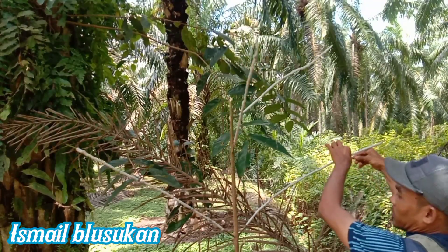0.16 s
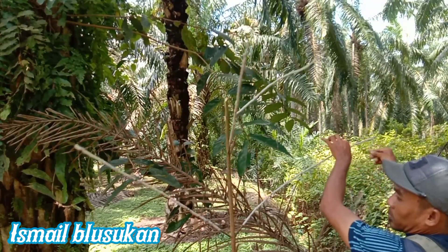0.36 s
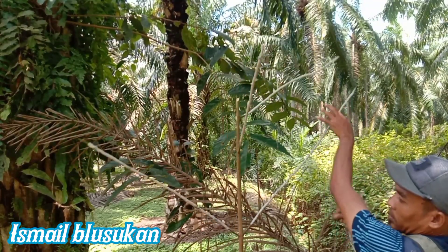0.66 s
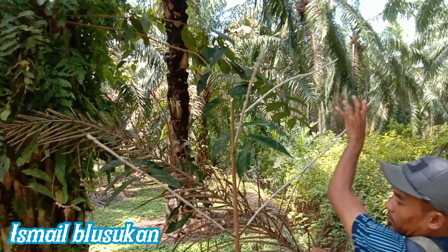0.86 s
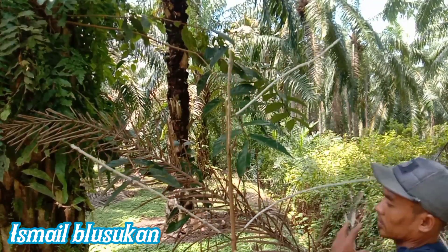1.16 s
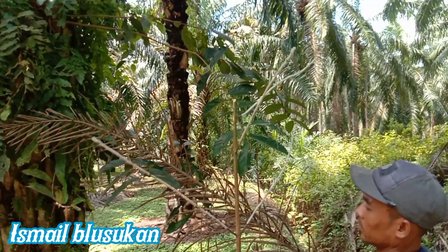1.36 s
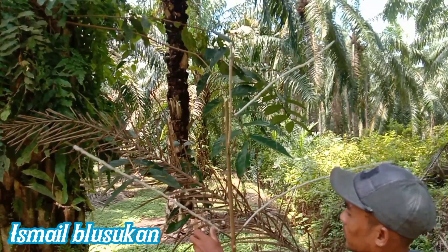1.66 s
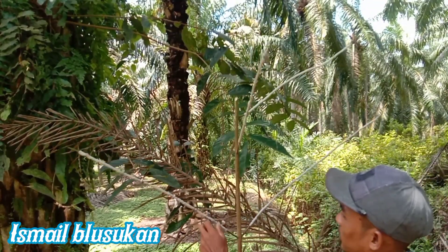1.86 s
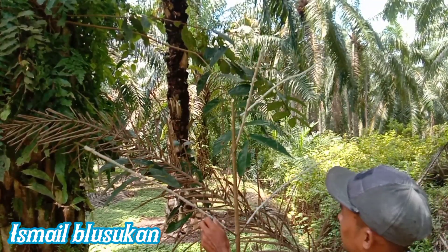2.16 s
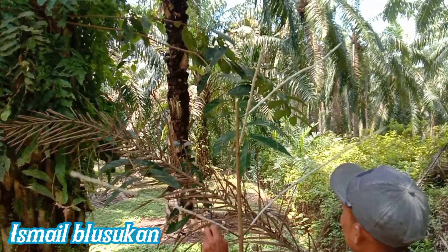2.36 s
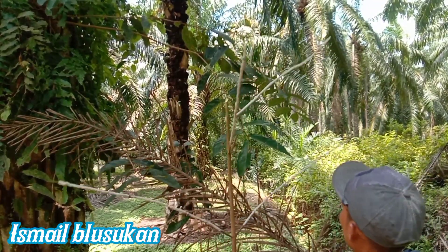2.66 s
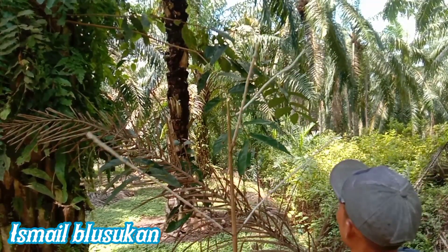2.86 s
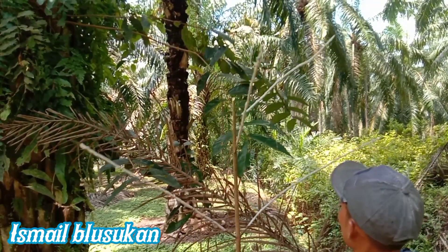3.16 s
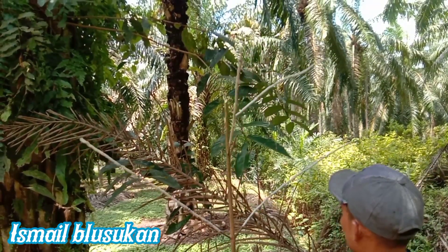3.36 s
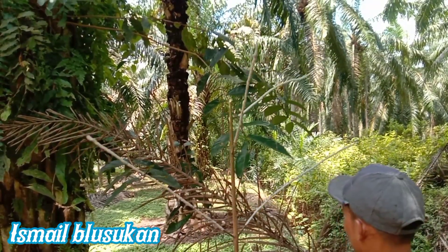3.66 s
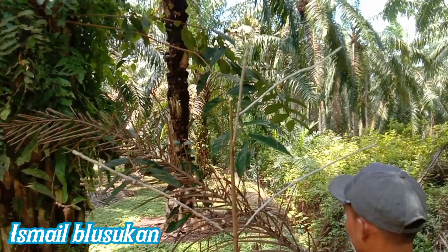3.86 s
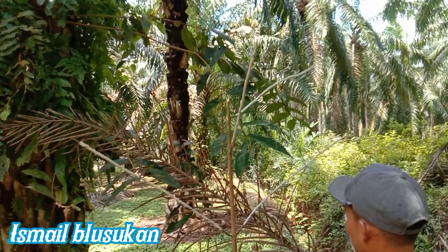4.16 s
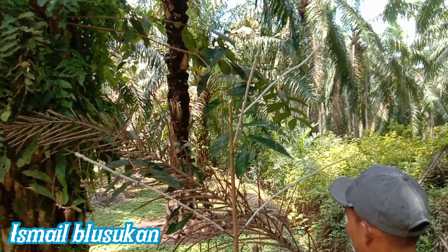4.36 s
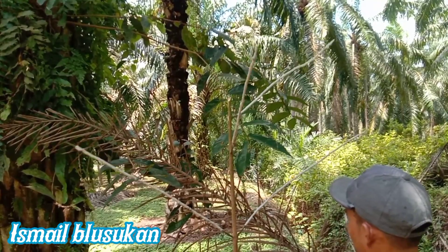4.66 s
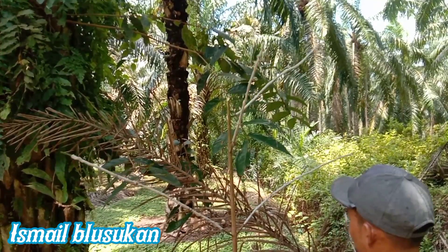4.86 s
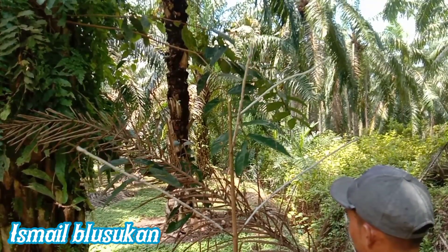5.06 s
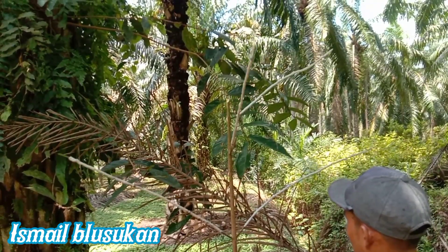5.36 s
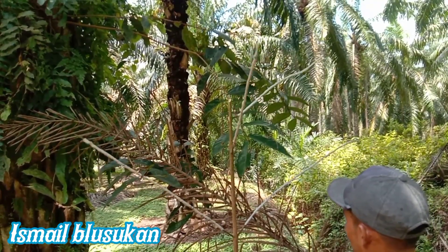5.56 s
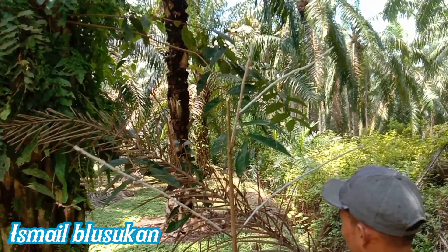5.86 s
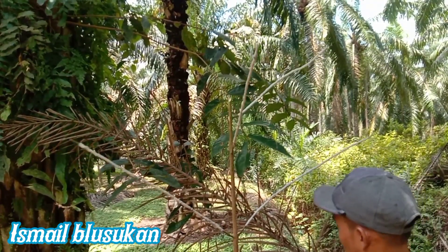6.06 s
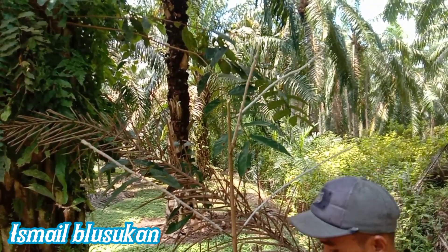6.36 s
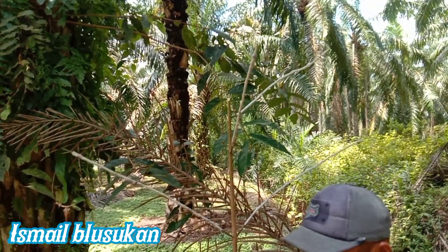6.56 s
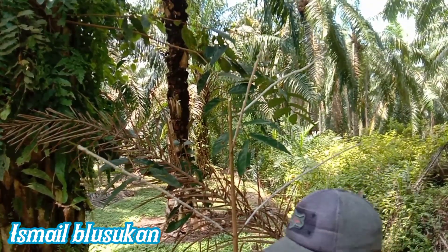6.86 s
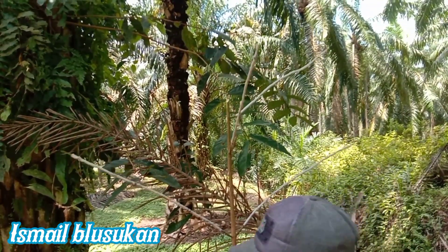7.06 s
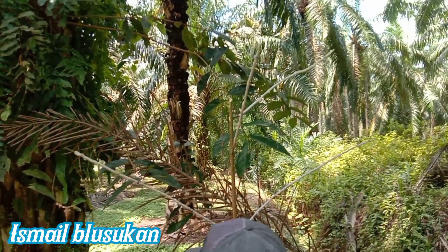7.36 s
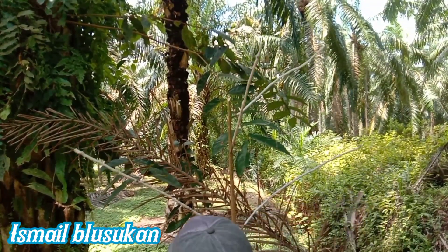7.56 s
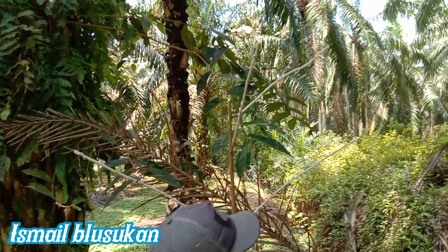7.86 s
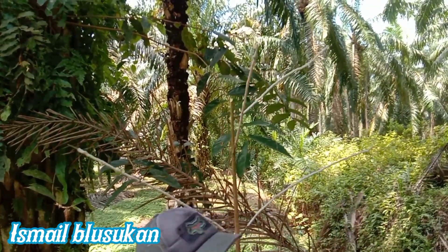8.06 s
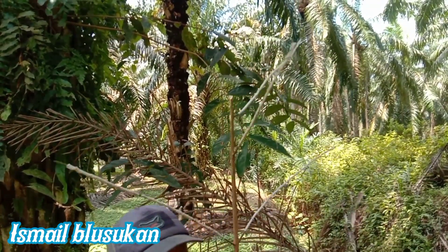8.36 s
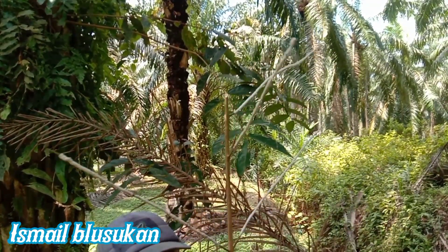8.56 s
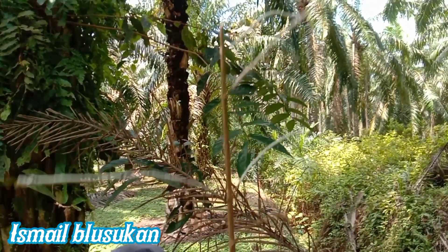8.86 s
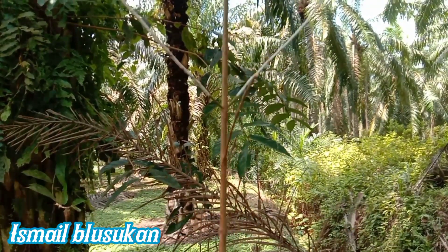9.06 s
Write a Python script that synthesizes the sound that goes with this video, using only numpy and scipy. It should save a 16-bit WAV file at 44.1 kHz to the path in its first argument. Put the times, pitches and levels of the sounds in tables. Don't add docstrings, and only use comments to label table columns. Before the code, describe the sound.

Soft insect shimmer, microphone bumps and faint far chirps outdoors, then nearby speaker hiss, a few clicks, and loud piercing whistled bird notes.

```python
import sys
import numpy as np
from scipy import signal
from scipy.io import wavfile
from scipy.ndimage import uniform_filter1d

SR = 44100
rng = np.random.default_rng(int(sys.argv[2]) if len(sys.argv) > 2 else 0)


def output_pcm(signal):
    pcm = np.clip(np.atleast_2d(signal).T, -1, 1) * 32767
    wavfile.write(sys.argv[1], SR, np.round(pcm).astype(np.int16))


def invert_db(level):
    return 10 ** (np.asarray(level, dtype=float) / 20)


N = 406161
TIME_S = np.arange(N) / SR


def evened(x):
    return x / np.sqrt(np.mean(x ** 2) + 1e-20)


def add(mix, s, sound):
    part = mix[round(s * SR):][:len(sound)]
    part += sound[:len(part)]


def along(rows):
    return np.interp(TIME_S, *np.transpose(rows))


def wander(per_s):
    size = int(SR / per_s)
    return evened(uniform_filter1d(uniform_filter1d(rng.standard_normal(N), size), size))


def noise(colour, lo_hz, hi_hz, size, patchy_db, patch=(7, 9)):
    hz = np.fft.rfftfreq(size, 1 / SR)
    a, b, patches = rng.standard_normal((N * 4 // size + 6, len(hz), 3)).T
    for axis in (0, 1):
        patches = uniform_filter1d(patches, int(patch[axis]), axis=axis)
    colour_hz, colour_db = np.transpose(colour)
    shape = invert_db(np.interp(np.log(hz + 1), np.log(colour_hz), colour_db, left=-90, right=-90))
    inside = (hz >= lo_hz) & (hz <= hi_hz)
    share = np.sqrt(np.sum(shape[inside] ** 2) / np.sum(shape ** 2))
    z = (a + 1j * b) * shape[:, None] * invert_db(patchy_db * evened(patches))
    return evened(signal.istft(z, nperseg=size, noverlap=size * 3 // 4)[1][:N]) / share


def resonate(x, hz, width):
    b, a = signal.iirpeak(hz, hz / width, SR)
    return signal.lfilter(b, a, signal.lfilter(b, a, x))


def butter(order, hz, kind):
    return signal.butter(order, hz, kind, fs=SR, output='sos')


def dulled(x, hz):
    return signal.lfilter(*signal.butter(2, hz, fs=SR), x)


def band_gain(x, gain, order, hz, kind):
    return x + (gain - 1) * signal.sosfilt(butter(order, hz, kind), x)


def loudness_db(x, size):
    return 10 * np.log10(abs(uniform_filter1d(x ** 2, size=size)) + 1e-12)


def swells(rows, fall_s):
    t = np.arange(0, N + 64, 64) / SR
    power = 0
    for s, db, rise_s in rows:
        away = np.maximum((s - t) / rise_s, (t - s) / fall_s)
        power = power + invert_db(2 * db) * np.exp(-2 * away)
    return np.interp(TIME_S, t, np.sqrt(power))


def whistle(rows, overtones, growth):
    s, hz, db = np.transpose(rows)
    t = np.arange(s[0], s[-1], 1 / SR)
    hz, db = (uniform_filter1d(np.interp(t, s, c), size=60) for c in (hz, db))
    angle = 2 * np.pi * np.cumsum(hz) / SR
    tone = sum(invert_db(o_db + (k > 1) * growth * db) * np.sin(k * angle) for k, o_db in overtones)
    return np.sqrt(2) * invert_db(db) * tone * signal.windows.tukey(len(t), .1)


def trunks(x, t60, gap_s, late_db, late_t60, dull_hz):
    taps, at = np.zeros(SR), np.arange(0, SR - 20, 20)
    taps[at + rng.integers(0, 20, len(at))] = rng.choice([-1., 1.], len(at))
    t = np.arange(SR) / SR
    late = dulled(taps * invert_db(late_db - 60 * t / late_t60), dull_hz)
    tail = (t > gap_s) * (taps * invert_db(-60 * t / t60) + late)
    return signal.fftconvolve(x, tail / np.linalg.norm(tail))[:N]


# pitch_hz, level_db per Hz
AIR_COLOUR = [(35, -20), (70, -10), (100, -13.5), (150, 0), (314, -9), (1060, -15.5), (1270, -14.5),
              (3830, -21), (4650, -7), (5650, -2.5), (6470, -32.5), (7270, -31), (15500, -33.5)]


def air():
    return invert_db(-70.5) * noise(AIR_COLOUR, 150, 15500, size=1024, patchy_db=2.5)


# start_s, level_db
BREEZE = [(0, 3.5), (.3, 0), (1.2, 1), (1.77, 1.5), (2.15, -3.5), (2.55, 14.5), (2.85, 2), (3.2, 5),
          (3.65, 18.5), (4.0, -0.5), (4.35, 17.5), (5.0, 1.5), (5.5, 1), (5.9, 7), (6.75, -8), (7.6, 9.5),
          (8.5, 7.5), (9.1, 20)]
# pitch_hz, level_db per Hz
WIND_COLOUR = [(8.8, -55), (15, -12), (27, -29), (46, -18), (70, 3), (97, 1), (166, -11.5), (326, -37),
               (400, -38.5), (520, -72), (880, -120)]
# start_s, peak level_db, pitch_hz
THUMPS = [(1.338, -50, 92), (2.486, -37.5, 95.9), (2.559, -41.5, 81), (3.396, -40, 82), (3.467, -42, 100),
          (3.617, -33, 93), (3.717, -37, 88), (3.874, -40.5, 82.4), (4.247, -23, 90), (4.39, -31.5, 94),
          (4.62, -34, 101), (4.785, -41, 107), (4.882, -36, 62), (4.95, -30.5, 131), (5.136, -41.5, 122),
          (5.201, -47.5, 96), (5.294, -45, 109), (5.413, -45.5, 93), (5.574, -44, 85.4), (5.762, -47.5, 72),
          (5.954, -42, 60), (6.21, -45, 123), (6.314, -36.5, 115), (7.387, -41.5, 54.7), (7.46, -45, 89),
          (7.548, -49, 72.7), (7.832, -40.5, 101), (8.12, -55, 81), (9.141, -34, 70.2), (9.022, -32, 103)]
# start_s, level_db, rise_s
SHAKES = [(1.17, -66.5, 0.049), (1.69, -74, .03), (2.66, -76, 0.3), (2.78, -75, .03), (3.76, -68, 0.32),
          (4.02, -91, .015), (4.36, -68.5, 0.11), (4.66, -72, .03), (4.98, -68.5, 0.094), (5.95, -72, 0.31),
          (6.11, -78, .015), (6.23, -71, 0.017), (6.81, -71, 0.15)]


def wind():
    breeze = along(BREEZE)
    buffet_s = 0.047
    buffet = swells([(s + buffet_s / 2, db - 10, buffet_s / 2) for s, db, hz in THUMPS], buffet_s)
    lumps = invert_db(-4.5 + 2.5 * wander(40))
    rumble = noise(WIND_COLOUR, 40, 200, size=2048, patchy_db=4.5)
    out = np.hypot(invert_db(-70 + breeze), buffet) * lumps * rumble
    for s, db, hz in THUMPS:
        cycles = np.arange(-1.2, 1.6, hz / SR)
        add(out, s, invert_db(db - 8.5) * np.cos(2 * np.pi * cycles) * np.exp(-(cycles / 0.77) ** 2))
    leaves = [(400, -11.0), (1200, -9.5), (2200, -10.0), (4000, -15.5), (9000, -24.0), (15500, -32)]
    rustle = np.hypot(invert_db(-86.5 + 0.21 * breeze), swells(SHAKES, fall_s=0.12))
    return out + invert_db(-8.5) * rustle * noise(leaves, 1500, 2600, size=256, patchy_db=4.5)


# pitch_hz, width_hz, level_db, throb_db, pulse_db
CHORUS = [
    (135.7, 32, -75, -1.5, -1),
    (1270, 81, -83.5, 4, 0),
    (7340, 470, -88.5, 1, 3),
]
# pitch_hz, level_db per Hz
CICADAS = [(2290, -64), (4000, -51.5), (4200, -15.5), (4670, 1.5), (4890, 4.5), (5170, -11.5), (5630, 5.5),
           (5900, -1), (6300, -26.5), (6600, -21.5), (8580, -65), (14500, -120)]
# start_s, pitch_hz, level_db
HIGH_TICKS = [(1.222, 15150, -64), (8.205, 15100, -54), (8.36, 15000, -53), (8.497, 15100, -53),
              (8.722, 14500, -61), (9.132, 15100, -66)]


def insects():
    pulse_per_s, pulse_at_s = 8.48, 2.052
    pulse = np.tanh(2 * np.sin(2 * np.pi * pulse_per_s * (TIME_S - pulse_at_s)))
    out = np.zeros(N)
    for hz, width, db, throb_db, pulse_db in CHORUS:
        line = evened(resonate(rng.standard_normal(N), hz, width))
        out += invert_db(db + throb_db * wander(24) + pulse_db * pulse) * line
    streaks = noise(CICADAS, 4400, 6000, size=512, patchy_db=3.5, patch=(3, 30))
    out += invert_db(-68 + 0.2829 * along(BREEZE)) * streaks
    t = np.arange(500) / SR
    for s, hz, db in HIGH_TICKS:
        add(out, s, invert_db(db) * np.sin(2 * np.pi * hz * t) * np.hanning(len(t)))
    return out


# start_s,
# length_s, pitch_hz, width_hz, level_db
NOISE_SWELLS = [(1.118, 0.12, 2000, 602, -76), (2.73, 0.07, 1900, 60, -81), (2.74, 0.23, 2460, 90, -82),
                (3.7, 0.22, 1800, 70, -80), (3.6, .07, 1190, 80, -70), (3.425, .1, 1400, 120, -78),
                (3.645, .06, 5700, 300, -61.5), (3.722, .06, 5000, 900, -58), (3.478, .06, 4800, 300, -68),
                (5.95, .04, 5400, 700, -57), (6.665, 0.026, 990, 200, -72), (6.748, 0.11, 1370, 250, -71),
                (6.817, 0.033, 1004, 150, -67), (6.865, 0.0038, 3000, 1500, -62.5),
                (7.301, 0.13, 810, 540, -67.5), (8.481, 0.062, 840, 350, -58), (6.383, .24, 62, 35, -71),
                (6.6, .24, 61, 35, -74), (6.794, 0.17, 60, 38, -74), (2.95, 0.22, 65, 44, -67),
                (3.95, 0.16, 65, 40, -68), (7.65, .24, 57, 35.02, -66), (8.326, .03, 660, 400, -61),
                (8.53, 0.06, 760, 400, -63), (8.95, 0.06, 500, 300, -67), (5.51, .24, 1270, 65, -73.5),
                (5.6, .2, 1270, 67, -77), (8.468, .03, 7000, 500, -37.5), (7.6, .24, 1750, 300, -61.5),
                (3.23, .075, 8700, 1500, -72), (3.555, .075, 8700, 1500, -71), (5.455, .07, 8700, 1500, -77),
                (5.78, .07, 8700, 1500, -77), (7.95, .04, 6900, 600, -50), (3.225, .07, 4100, 500, -72),
                (3.55, .09, 4000, 500, -69), (5.45, .06, 4100, 500, -74)]


def noise_swells():
    out = np.zeros(N)
    grits = rng.standard_normal((len(NOISE_SWELLS), SR // 4))
    for (s, length_s, hz, width, db), grit in zip(NOISE_SWELLS, grits):
        count = round(length_s * SR)
        rub = evened(resonate(grit, hz, width))[-count:]
        add(out, s, invert_db(db) * rub * signal.windows.tukey(count, .6))
    return out


# start_s, peak level_db, pitch_hz, bright_db
TICKS = [(0.867, -67, 1270, 3), (1.071, -67, 1250, -4), (1.225, -69, 1620, -10), (1.687, -71, 1540, -10),
         (4.178, -62.5, 1270, -12), (5.066, -76, 1270, 14), (5.702, -64, 1280, -6), (6.107, -60.5, 1280, 0),
         (6.234, -63.5, 1280, -6), (2.095, -65, 1270, -20), (2.488, -66, 1290, -12),
         (3.618, -66, 1210, -15), (4.018, -69, 1610, -4), (5.573, -65, 1290, -12), (5.83, -64, 1270, -6),
         (6.802, -68, 1280, -12), (1.156, -67, 2280, -6), (8.331, -47, 1310, -28),
         (8.339, -35.5, 1400, -22), (8.404, -42.5, 1270, -28), (8.482, -51, 1230, -26),
         (8.488, -52, 895, -26), (8.497, -55, 790, -23), (8.51, -58, 1630, -26), (8.523, -61, 1230, -25),
         (8.534, -45, 1030, -26), (8.556, -38, 1210, -24), (8.564, -37, 1269, -23), (8.362, -39, 1470, 9.5),
         (7.5, -40.0, 2600, -13), (8.548, -43, 1000, -17), (7.3, -51.5, 1170, -20)]


def ticks():
    out, t = np.zeros(N), np.arange(900) / SR
    grits = rng.standard_normal((len(TICKS), 900))
    for (s, db, hz, bright_db), grit in zip(TICKS, grits):
        ring = np.sin(2 * np.pi * hz * t) * invert_db(-60 * t / 0.03) * np.minimum(t / 0.00062, 1)
        grain = uniform_filter1d(grit, size=1 if bright_db > 2 else 7)
        snap = invert_db(bright_db - 60 * t / .004) * grain
        add(out, s, invert_db(db + 5.0) * (ring + snap))
    return out


# start_s, pitch_hz, level_db
SQUEAK = [(0, 3930, -21), (.022, 4600, -2), (.032, 5120, 0), (0.038, 5800, -5), (.048, 4600, -10),
          (.057, 4150, -5.5), (.074, 3910, 0.5), (0.085, 3840, -9), (.095, 3800, -30)]
PEEP = [(0, 4500, -8), (.005, 4380, 1), (.011, 4130, 5), (.024, 4020, -2), (.032, 4000, -22)]
CHIP = [(0, 2720, -24), (.029, 2964, -10), (.034, 4200, -11), (.039, 4240, -10), (.045, 3247, -2),
        (0.071, 3204, 2), (.078, 2950, -5.5), (.087, 2600, -13.5), (.096, 2450, -33)]
# multiple of the pitch, level_db
SQUEAK_OVERTONES = [(2.045, 0)]
PEEP_OVERTONES = [(2.2, -23)]
CHIP_OVERTONES = [(1.999, -11.5), (2.96, -26.5), (4, -42)]
# start_s, level_db, fundamental level_db, pitch factor
SQUEAKS = [(1.095, -71.5, 5.5, 0.96), (3.165, -55, -23, 0.95), (3.49, -54, -14, 0.94),
           (5.39, -61.5, -15, 0.95), (5.715, -62, 1.5, 0.95)]
PEEPS = [(1.183, -70, 2, 1.0), (3.258, -72, -4, 1), (3.58, -60.5, -3, 1), (5.482, -69, 1, 1.0),
         (5.797, -62, 3.5, 0.99)]
CHIPS = [(1.265, -56, 0.5, 1.014), (3.335, -47.5, -7, 0.99), (3.66, -47.5, -1.5, 1.01),
         (5.56, -53, -2, .99), (5.875, -49, -2.5, 1.02)]


def far_bird():
    out = np.zeros(N)
    for calls, shape, overtones in ((SQUEAKS, SQUEAK, SQUEAK_OVERTONES),
                                    (PEEPS, PEEP, PEEP_OVERTONES),
                                    (CHIPS, CHIP, CHIP_OVERTONES)):
        for s, db, first_db, pitch in calls:
            voice = whistle(np.multiply(shape, [1, pitch, 1]), [(0.99, first_db)] + overtones, growth=1.3)
            add(out, s, invert_db(db) * voice)
    flutter = np.sin(2 * np.pi * 131 * TIME_S) + np.sin(2 * np.pi * 223 * TIME_S)
    out = invert_db(2.2 * flutter) * dulled(out, 10500)
    wet = trunks(out, t60=0.18, gap_s=0.0047, late_db=-17, late_t60=0.7, dull_hz=4230)
    return invert_db(-2.5) * out + invert_db(-5.5) * wet


# start_s, pitch_hz, level_db
OPENER = [(0, 4680, -51), (.009, 5670, -36.5), (.032, 6140, -17), (.052, 6630, -9), (.069, 6710, -15),
          (.081, 6700, -26)]
RISE = [(0, 3029, -37), (.02, 3230, -23.5), (.038, 3520, -15), (.045, 3620, -7), (.067, 3884, -3),
        (.092, 4166, -3), (.103, 3875, -10), (.115, 3600, -11)]
TURN = [(0, 3655, -12), (.006, 3930, -6.5), (.017, 4500, -20.5), (.04, 4620, -26), (0.044, 4600, -27.5),
        (.048, 4643, -10), (.06, 5860, -24.5), (.074, 5250, -19), (.098, 4330, -13.5), (0.1067, 3986, -1.5),
        (0.11, 3910, -34.5)]
TURN_AGAIN = [(0, 3640, -11), (.007, 3900, -6.5), (.02, 4470, -18), (0.046, 4560, -13), (.056, 4603, -12.5),
              (.063, 5540, -25), (.068, 5800, -26.5), (.086, 5000, -21.5), (.102, 4380, -12),
              (.109, 4090, -11), (0.113, 3990, -2), (0.116, 3930, -32)]
HIGH = [(0, 4650, -27.5), (.01, 5770, -27), (0.023, 5830, -31), (0.033, 5897, -13), (0.046, 6470, -18),
        (.054, 6640, -11.5), (0.07, 6770, -17), (.082, 6716, -15.5), (0.09, 6490, -13), (0.097, 6230, -41)]
GRACE = [(0, 5940, -50), (.008, 6800, -26.5), (0.024, 7000, -24.5), (.04, 7000, -46)]
# start_s, level_db, stretch, pitch factor
OPENERS = [(7.953, -9.5, 1.06, 1.003)]
RISES = [(8.148, -0.5, .99, 1.003), (8.672, 1.6, 1.04, .997)]
TURNS = [(8.262, -0.23, 1.003, 1.003)]
TURNS_AGAIN = [(8.79, -0.92, 1.003, 1.003)]
HIGHS = [(8.472, 2, 1.003, 1.003), (9.004, 2.56, 0.95, 1.003)]
GRACES = [(7.946, -29, 0.87, 0.91), (8.466, -4, 0.61, 1.02), (8.998, -2, 0.74, .994)]


def song():
    out = np.zeros(N)
    for calls, shape in ((OPENERS, OPENER), (RISES, RISE), (TURNS, TURN),
                         (TURNS_AGAIN, TURN_AGAIN), (HIGHS, HIGH), (GRACES, GRACE)):
        for s, db, stretch, pitch in calls:
            voice = whistle(np.multiply(shape, [stretch, pitch, 1]), [(1, 0)], growth=0)
            add(out, s, invert_db(db) * voice)
    return out


# pitch_hz, width_hz
CONE_DIPS = [(3520, 66), (3728, 100), (4160, 78), (6250, 63), (6820, 73), (6350, 43), (6020, 52)]


def strained_cone(notes):
    for hz, width in CONE_DIPS:
        notes = signal.lfilter(*signal.iirnotch(hz, hz / width, SR), notes)
    drive = np.sqrt(abs(uniform_filter1d(notes ** 2, size=200))) + 0.053
    cube = signal.sosfilt(butter(6, [9600, 12300], 'band'), notes ** 3 / drive ** .8)
    square = notes ** 2 * drive ** -0.3
    bent = invert_db(-31.5) * square + invert_db(-29.0) * cube * (1 + 0.7 * wander(900))
    return notes + signal.sosfilt(butter(5, [6500, 13900], 'band'), bent)


# start_s, level_db
HISS = [(7.17, -51), (7.19, -48.5), (7.29, -45), (7.45, -46), (7.57, -49), (7.81, -51), (8.14, -44.5),
        (8.7, -45), (9.21, -45.5)]
# pitch_hz, level_db per Hz
HISS_COLOUR = [(180, -26), (300, -28.5), (996, -32), (1240, -19), (1740, -15), (2450, 1.5), (3260, -8.5),
               (4170, -2), (4710, -11.5), (5250, -11), (6190, -24.5), (7190, -15), (7800, -34.5),
               (10100, -56), (17200, -120)]
HISS_TOP = [(4590, -29.5), (7800, -2), (8500, -12), (9120, -14), (11000, -9), (12200, -21), (13700, -25),
            (14900, -24.5), (15600, -26)]


def speaker_hiss():
    since = np.maximum(TIME_S - HISS[0][0], 0)
    fresh = np.exp(-since / 0.096)
    louder_db = along(HISS) + 52
    hiss = noise(HISS_COLOUR, 2000, 2840, size=512, patchy_db=1.5, patch=(3, 40))
    top = noise(HISS_TOP, 7540, 15600, size=512, patchy_db=4, patch=(5, 30))
    hiss = band_gain(hiss, invert_db(3 - 51.5 * fresh), 4, 1950, 'low')
    hiss = band_gain(hiss, invert_db(1.2429 * louder_db + 6.5 * fresh), 2, 3200, 'high')
    hiss = hiss + invert_db(-23 + 0.75 * louder_db + 2.5 * fresh) * top
    return band_gain(hiss, invert_db(-7 * np.exp(-since / 0.071)), 2, [1900, 3000], 'band')


def band_lowered(x, gain, order, band_hz):
    return x + (gain - 1) * signal.sosfiltfilt(butter(order, band_hz, 'band'), x)


# pitch_hz, width_hz, boost level_db
CONE_PEAKS = [(1280, 70, 12), (4150, 170, 4.5), (5800, 28, 9.5)]
# pitch_hz, level_db per Hz
GRILLE_BUZZ = [(6000, -20.5), (7500, 1), (10500, -3), (12500, -11.5), (14000, -19.5), (15200, -23.5)]


def decoy():
    notes = strained_cone(song())
    echoes = invert_db(-7) * trunks(notes, t60=0.22, gap_s=0.0051, late_db=-10.5, late_t60=0.82, dull_hz=14000)
    over_db = np.maximum(loudness_db(notes, 900) + 15, 0)
    song_hz, below_hz = [4600, 6200], [1350, 2600]
    hiss = band_lowered(speaker_hiss(), invert_db(-1.4 * over_db), 3, song_hz)
    hiss = band_lowered(hiss, invert_db(-.5 * over_db), 2, below_hz)
    echoes = band_lowered(echoes, invert_db(-.8 * over_db), 3, song_hz)
    switched_on = TIME_S >= HISS[0][0]
    cone = notes + switched_on * invert_db(along(HISS)) * hiss
    for hz, width, db in CONE_PEAKS:
        cone = cone + (invert_db(db) - 1) * signal.lfilter(*signal.iirpeak(hz, hz / width, SR), cone)
    played = cone + echoes
    grit = noise(GRILLE_BUZZ, 7000, 15500, size=256, patchy_db=1.5)
    shrill = signal.sosfilt(butter(8, 4900, 'high'), played)
    shaking = abs(uniform_filter1d(shrill ** 2, size=1500)) ** 0.77
    return played + invert_db(-29.5) * shaking * grit


def scene():
    return (air() + wind() + insects() + noise_swells() + ticks() + far_bird() + decoy())[None]


def top_cut(x):
    return signal.sosfilt(signal.butter(12, 15520, fs=SR, output="sos"), x)


def record(dry):
    power_db = loudness_db(dry[0], 440)
    fall = np.arange(N) * 69.0 / SR
    over_db = np.maximum(np.maximum.accumulate(power_db + fall) - fall + 13, 0)
    dry = signal.lfilter(*signal.butter(2, 48, 'high', fs=SR), dry)
    dry = dry + 1.1 * signal.lfilter(*signal.iirpeak(15000, 14, SR), dry)
    dry = signal.oaconvolve(dry, signal.firwin(401, 15520, fs=SR)[None], 'same')
    ducked = dry / invert_db(0.64 * uniform_filter1d(over_db, size=200))
    return top_cut(1.383 * np.tanh(ducked / 1.29))


dry = scene()
out = record(dry)
output_pcm(out)
```